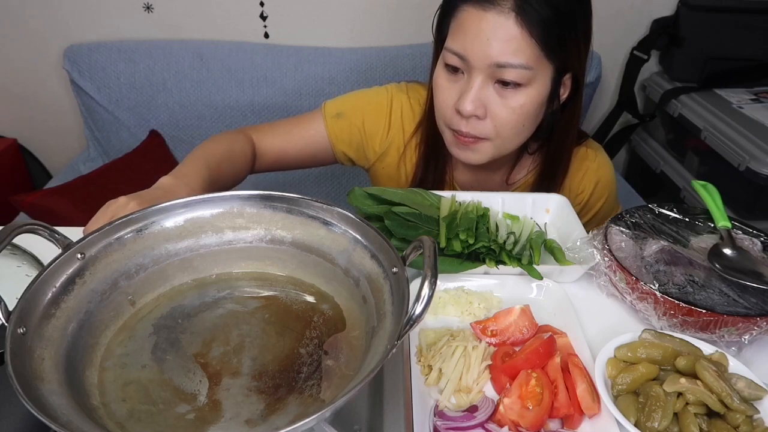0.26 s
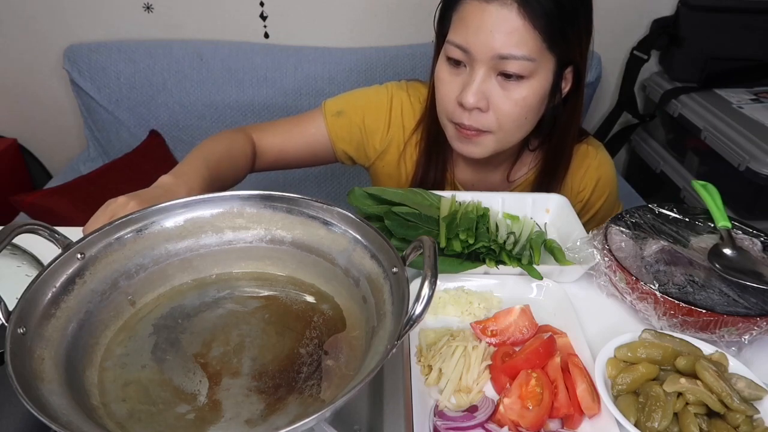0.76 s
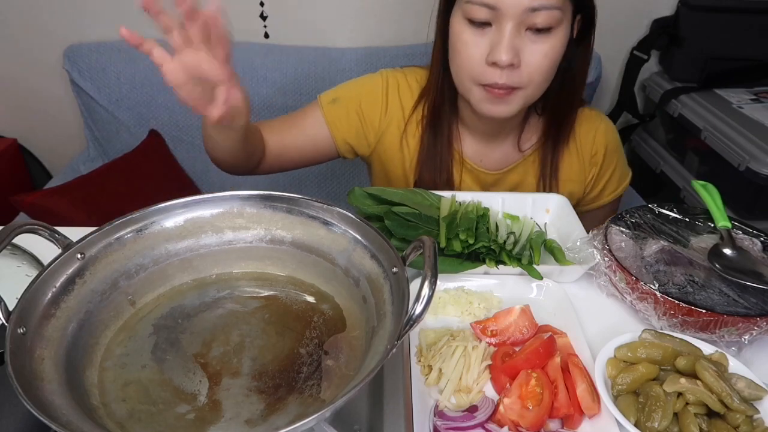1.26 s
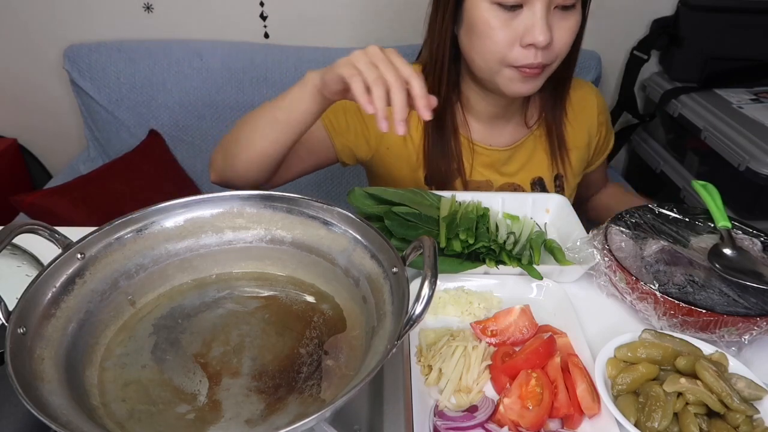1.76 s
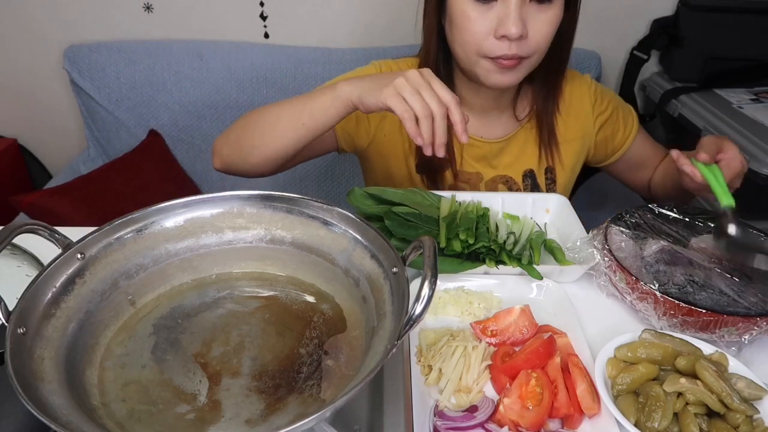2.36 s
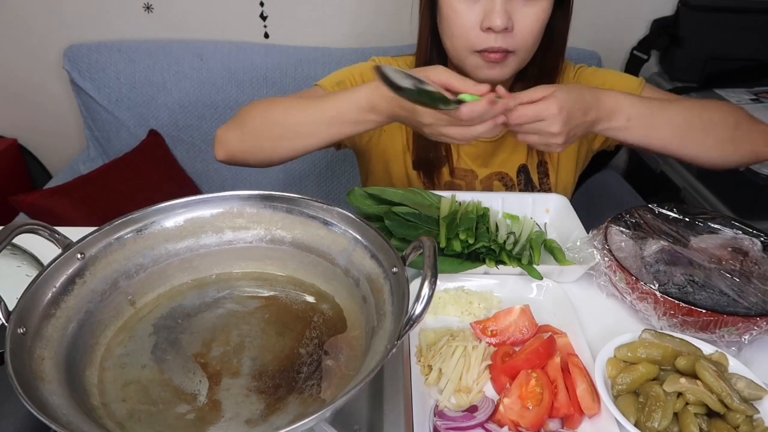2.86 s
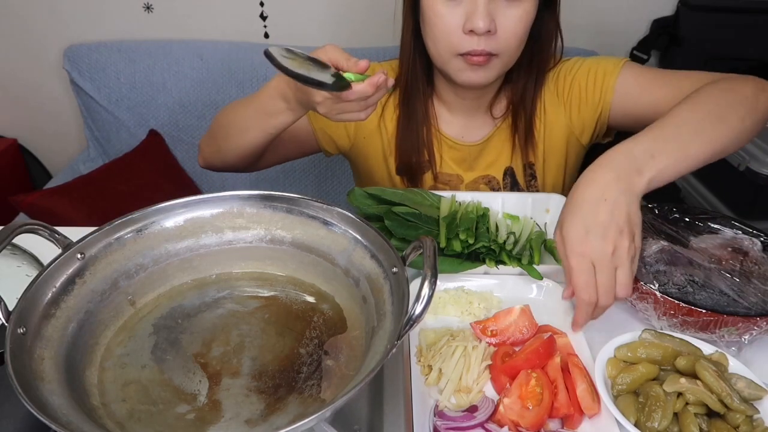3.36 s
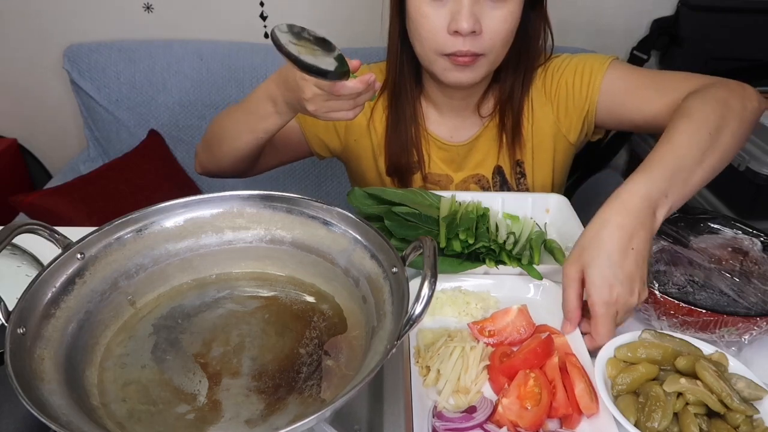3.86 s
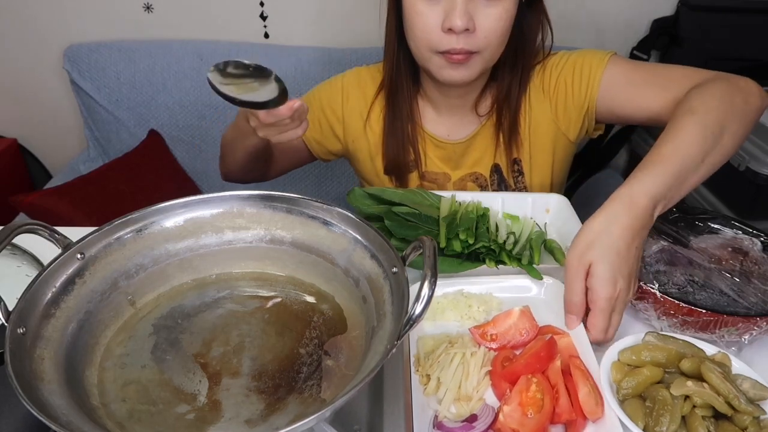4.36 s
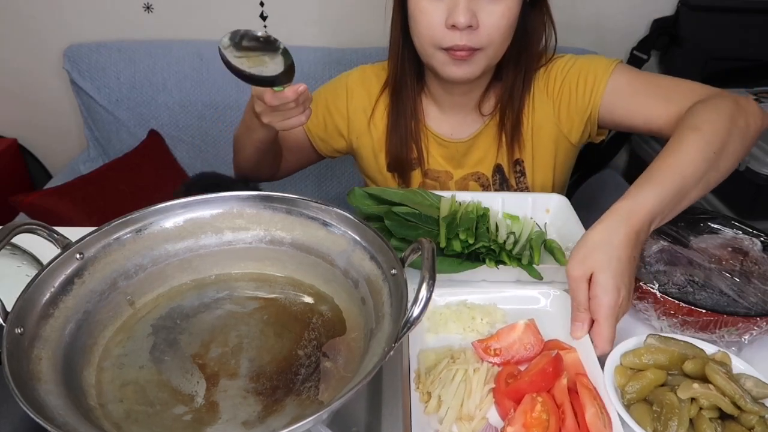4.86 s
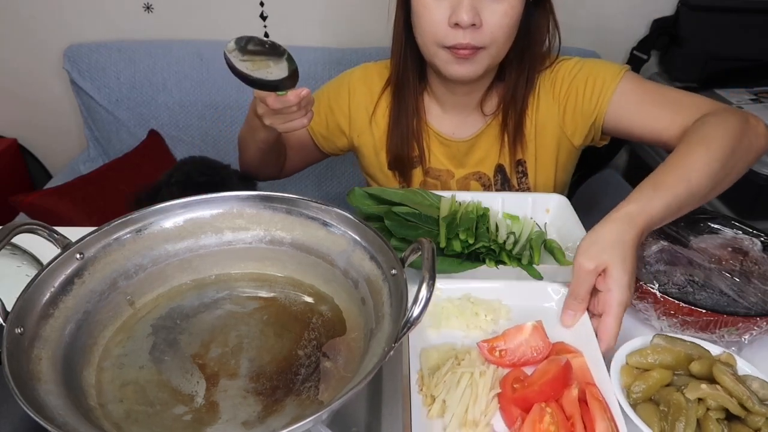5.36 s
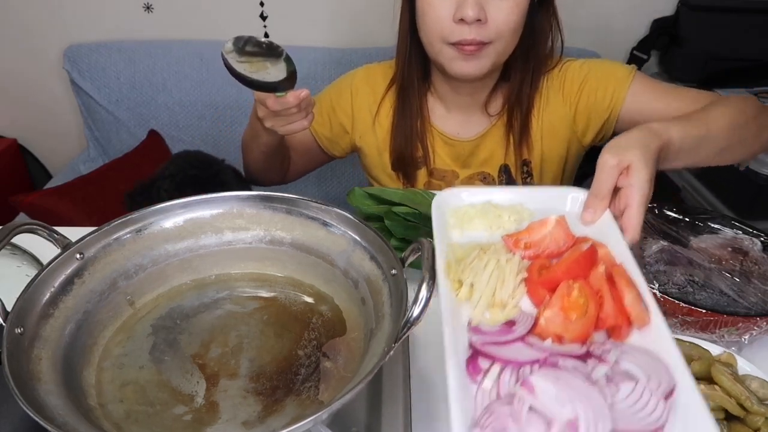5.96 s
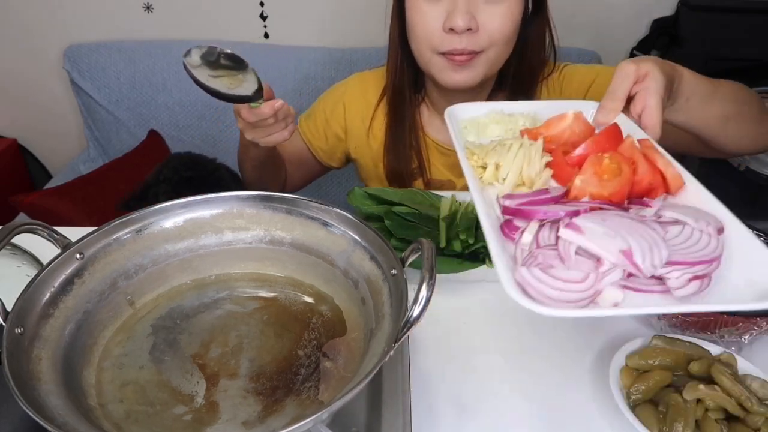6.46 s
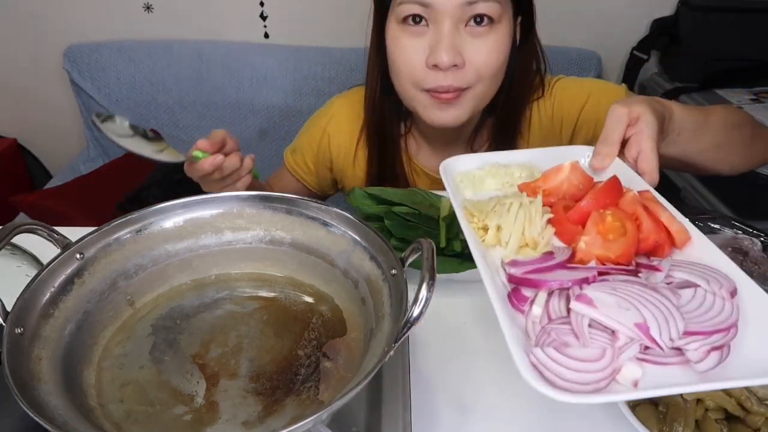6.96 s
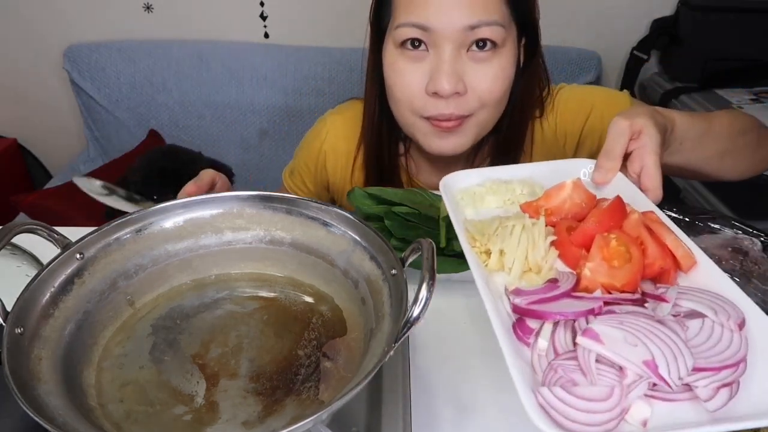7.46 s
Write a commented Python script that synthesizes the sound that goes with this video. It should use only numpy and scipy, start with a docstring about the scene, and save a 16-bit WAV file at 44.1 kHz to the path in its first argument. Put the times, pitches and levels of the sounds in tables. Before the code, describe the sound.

Dishes knock, scrape and squeak on a table as a tray is shifted and lifted, over a droning fan and a ticking clock.

```python
"""From the start a fan drones over mains hum in a small furnished room, and a clock ticks once a second.
A dish is nudged near 1 s, and a ladle is taken from its plate near 2.4 s. From 3.5 to 5.8 s dishes are
knocked, dragged and lifted: impacts excite the damped modes of dish, tray and table, friction drives
them into rasps and squeaks, and a grazed bowl rings with beats. After the loudest knock, at 5.5 s,
the automatic gain drops and creeps back, and the fan and clock carry on alone."""
import sys
import numpy as np
from scipy import signal
from scipy.fft import rfft, irfft
from scipy.io import wavfile

SR = 44100
rng = np.random.default_rng(int(sys.argv[2]) if len(sys.argv) > 2 else 0)


def unload_wav(signal):
    """Save mono or channel-first audio to the path in sys.argv[1] as 16-bit WAV at rate SR, clipped to [-1, 1]."""
    wavfile.write(
        sys.argv[1],
        SR,
        np.round(np.clip(np.atleast_2d(signal).T, -1, 1) * 32767).astype(np.int16),
    )


N = 339570

# Normal modes of each body: frequency_hz, level_db, t60_s
DISH_MODES = [(795, -4.5, 0.012), (936, 4.5, 0.016), (1093, 6, 0.02), (1190, 3.5, 0.02), (1350, 2, 0.022),
              (1523, 0, 0.025), (1597, 2.5, 0.023), (1676, 2, 0.015)]
EDGE_MODES = [(1857, 2.8, 0.013), (2114, 4, 0.013), (2330, 3, 0.0078), (2700, 2, 0.0093), (3080, 0, 0.0079),
              (3450, -1, 0.007), (3770, -4, 0.006), (4400, -8.5, 0.0061), (4960, -10, 0.003)]
TRAY_MODES = [(467, 0, 0.029), (520, 0, 0.04), (637.6, 2.3, 0.025), (705, -0.6, 0.035), (767, -0.4, 0.013)]
TABLETOP_MODES = [(282, -7, 0.034), (309.6, 0, 0.046), (343, 4, 0.042), (468, -3, 0.073)]
FRAME_MODES = [(143, 0.0072, 0.06), (206, 0, 0.04)]
# Impacts: start_s, dish_peak_db, tray_db, edge_db, tabletop_db, frame_db, hardness_db, rattle_t60_s
# (tray_db to hardness_db are relative to the dish)
IMPACTS = [(0.2588, -54.5, -3, 18, 7, -18, 15, 0.099), (1.067, -40, 0, -3.5, -5, -25, -28, 0.11),
           (1.0839, -45, 3, -11, -18, -21, -26, 0.073), (3.456, -15, -6, -0.5, -8, -11.5, -2, 0.031),
           (3.461, -25.5, 5.5, -4, -5, -4, -9, 0.075), (3.7401, -35, -1.5, -4.5, 1, -9, -5.5, 0.1),
           (3.9651, -25, -1.5, 2.5, -16, -7.5, -9.5, 0.16), (4.2174, -46, -5, 2, 8, -7, -25, 0.13),
           (4.294, -45, 1, 4, -5, -8, -19, 0.071), (4.339, -20.5, -6, 5.5, -6, -10.5, -13, 0.06),
           (4.495, -21.5, -0.5, 2.5, -0.5, -32, -14, 0.16), (4.5607, -24.5, -2, -3.5, -12, -5.5, -25, 0.16),
           (4.584, -26.5, 3, -6, 5, -17, -30, 0.065), (4.7076, -38, -4, -2, -4, -20, -25, 0.043),
           (4.7483, -15, -8, 3.5, -5.5, -42, -11, 0.018), (4.817, -29.5, -1, 0, 0, -3, -35, 0.049),
           (4.9251, -27.5, -6.5, -2.5, -4, -24, -40, 0.05), (4.951, -33, -23, 0, -11.5, -22, -24, 0.026),
           (4.9694, -21, -3, 4.5, -10.5, -18, -6, 0.13), (5.103, -32, -2.5, 20, -15, -24.5, -5, 0.05),
           (5.1132, -13, -10.5, 6.5, -1, -36, -11, 0.023), (5.1212, -21.5, -4, 4, 0.5, -34, -10, 0.05),
           (5.1535, -20, -6, 10.5, -27, -18, 3.5, 0.016), (5.4741, -41, -2, 4.5, -19.5, -28, -16, 0.033),
           (5.518, -2.5, -1.5, -1.5, -1.5, -18.5, -41, 0.09),
           (5.6388, -31, 4.5, 5.5, -21, -26, -36.5, 0.091), (5.7356, -25, 3, 2, -34, -37, -34, 0.056)]
def knocks():
    """Impact excitation: one contact force drives five bodies; a harder contact adds more crack."""
    start_s, dish_db, tray_db, edge_db, top_db, frame_db, hardness_db, rattle_s = np.transpose(IMPACTS)
    impacts = np.maximum(1.95 + 0.03 * dish_db, .3)  # soft knocks have a weaker first contact
    forces = [contact_force(t60, impact) for t60, impact in zip(rattle_s, impacts)]
    bodies = [(EDGE_MODES, edge_db), (FRAME_MODES, frame_db), (TABLETOP_MODES, top_db),
              (TRAY_MODES, tray_db), (DISH_MODES, 0)]
    ringing = sum(strike(zip(start_s, dish_db + share_db, forces), modal_body(modes))
                  for modes, share_db in bodies)
    treble_forces = [contact_force(3.7 * t60, impact=0.63) for t60 in rattle_s]
    return ringing + strike(zip(start_s, dish_db + hardness_db - 4, treble_forces), crack)


# Modes of the glazed rim: frequency_hz, level_db, t60_s
RIM_MODES = [(2315, -7, .008), (2450, 0, .011), (2570, -4, .012), (2735, -8, .01), (2980, -14, .008),
             (3850, -11, .008), (4070, -6, .014), (4350, -12, .006), (4700, -15, .007), (5200, -22, .006),
             (6150, -27, .008)]
# Touches on it: start_s, peak_db, chatter_t60_s
RIM_CONTACTS = [(4.3396, -17.5, .07), (4.7483, -19, .09), (4.818, -33.5, .09), (4.971, -29, .08),
                (5.154, -20, .04), (5.5182, -26, .05)]
def rim_chatter():
    """Contact chatter: rapid rebounds re-excite the high modes of the rim."""
    blows = [(start_s, db, contact_force(t60, impact=2.2)) for start_s, db, t60 in RIM_CONTACTS]
    return strike(blows, modal_body(RIM_MODES, spread_db=2, lowpass_hz=8900))


# Drags: peak_s, dish_and_tray_rms_db, rise_s, fall_s, edge_db, table_db, grit_db (last three relative)
DRAGS = [(1.061, -50.5, 0.076, 0.2, -8, -11, -32), (4.112, -47, 0.054, 0.06, -6.5, -4, -31),
         (4.28, -47, 0.19, 0.06, -5.5, -3, -20), (4.55, -35, 0.066, -0.15, -11, -11, -32),
         (4.6, -43.5, 0.063, 0.21, -3, 1, -20), (4.738, -40.5, 0.054, -0.2, -11, -1.5, -22),
         (4.98, -44, 0.16, 0.46, -10, 1, -29), (5.104, -32.5, 0.06, 0.1969, 2.5, -18, -19),
         (5.173, -37, 0.14, 0.11, -5.5, -3, -14), (5.486, -31.5, 0.062, 0.1144, -4, -12, -25),
         (5.56, -30, 0.11, 0.02, -7, 2.5, -24), (5.666, -32.5, 0.11, 0.1127, -6, -11, -26),
         (5.754, -33.5, 0.063, 0.0861, -2, -20, -20.5)]
def slides(friction):
    """Sliding friction: micro-contacts drive the bodies that knocks excite, and grit adds hiss."""
    edge_db, table_db, grit_db = np.transpose(DRAGS)[4:]
    grid_s = np.arange(0, N + 64, 64) / SR
    swells = [swell(grid_s - peak_s, db, rise_s, fall_s) for peak_s, db, rise_s, fall_s, *_ in DRAGS]
    layers = [(table_db, modal_body(FRAME_MODES + TABLETOP_MODES)(friction)),
              (np.zeros(len(DRAGS)), modal_body(TRAY_MODES + DISH_MODES, spread_db=-0.5)(friction)),
              (edge_db, modal_body(EDGE_MODES, spread_db=1.5)(friction)),
              (grit_db, butter(butter(friction, 2, 4000, "high"), 2, 6500)),
              (grit_db - 27.5, butter(friction, 2, [11500, 15200], "band"))]  # the finest grains
    t = np.arange(N) / SR
    return sum(np.interp(t, grid_s, amp(share_db) @ swells) * unit_rms(rasp) for share_db, rasp in layers)


# Catches of a dragged dish: peak_s, frequency_hz, rms_db, rise_s, fall_s
CATCHES = [(4.572, 1110, -33, 0.022, 0), (4.595, 2710, -41, 0.045, 0.1), (5.071, 1130, -30, 0.018, -0.36),
           (5.115, 2060, -40, 0.025, -2.3), (5.125, 3140, -34, 0.039, -0.44),
           (5.17, 1766, -31.5, .05, -0.31), (5.175, 2770, -31, 0.03, -0.61),
           (5.19, 3450, -41, 0.044, -0.68), (5.475, 2000, -38, 0.034, 0.15), (5.49, 1266, -31, 0.026, 0),
           (5.66, 2120, -48, 0.045, -1.6), (5.755, 2020, -35, 0.058, -0.01)]
def squeaks(friction):
    """Forced resonance: the dish catches, and friction keeps one narrow mode singing."""
    half = SR // 4
    t, out = np.arange(-half, half) / SR, np.zeros(N)
    for peak_s, hz, db, rise_s, fall_s in CATCHES:
        span = slice(round(peak_s * SR) - half, round(peak_s * SR) + half)
        out[span] += swell(t, db, rise_s, fall_s) * unit_rms(resonator(friction[span], hz, t60=.04))
    return out


def friction_force(contacts_per_s=6000, lumps_per_s=90, lump_db=3):
    """Surface roughness: dense random impulses whose strength comes in lumps."""
    knots = rng.standard_normal(int(N / SR * lumps_per_s) + 2)
    lumps = amp(lump_db * np.interp(np.arange(N) / SR * lumps_per_s, np.arange(len(knots)), knots))
    touching = rng.random(N) < contacts_per_s / SR
    strength = amp(1.8 * np.minimum(rng.exponential(1, N), 4))
    return lumps * touching * strength * rng.choice([-1, 1], N)


# Modes of the steel ladle: frequency_hz, level_db, t60_s
LADLE_MODES = [(324, -2, 0.022), (630, 2, 0.016), (820, 0, .02), (916, -2.5, 0.033), (1250, -6, 0.019),
               (1400, -3, 0.011), (2060, -0.5, 0.014), (2500, -4, 0.0078), (3570, -4.5, 0.0098),
               (3810, -4, .008), (4390, -8, 0.0088), (5000, -13, .008)]
# Taps on its plate: start_s, peak_db, relative_crack_db, rattle_t60_s
LADLE_CONTACTS = [(2.298, -40, -9, 0.033), (2.439, -30, -1, 0.017), (2.4451, -25, -3.5, 0.06)]
def ladle():
    """Damped vibration: steel held in the hand rings only briefly after each tap."""
    start_s, peak_db, crack_db, rattle_s = np.transpose(LADLE_CONTACTS)
    forces = [contact_force(t60, impact=2) for t60 in rattle_s]
    steel = modal_body(LADLE_MODES, spread_db=3.5, lowpass_hz=7000)
    ringing = strike(zip(start_s, peak_db, forces), steel)
    return ringing + strike(zip(start_s, peak_db + crack_db, forces), crack)


# Modes of the bowl: frequency_hz, level_db, free_t60_s
BOWL_MODES = [(612, 0, .6), (656, -2, .5), (1351, -20, .15), (2062, -20, .12)]
# Grazes by a dish: start_s, peak_db, t60_fraction (what a touching hand leaves)
BOWL_GRAZES = [(1.0605, -38, 0.21), (4.22, -42.5, 1.0), (4.265, -35, 1.0), (5.722, -24.5, 0.44),
               (5.765, -25, 0.95)]
def bowl():
    """Beating: a single impulse excites the bowl, and its two close lowest modes interfere."""
    impulse = np.arange(SR // 2 + SR // 8) == 0
    out = np.zeros(N)
    for start_s, peak_db, fraction in BOWL_GRAZES:
        modes = [(hz, db, t60 * fraction) for hz, db, t60 in BOWL_MODES]
        out += strike([(start_s, peak_db, impulse)], modal_body(modes, spread_db=-5.5))
    return out


# Modes of the clock: frequency_hz, level_db, t60_s
CLOCK_MODES = [(1416, -6, 0.01), (1800, -9, .006), (2270, -5, 0.005), (2800, -9, 0.005), (3400, -8, 0.004),
               (3950, -9, .005), (4600, -14, .004), (5400, -17, 0.004), (6100, -20, .004)]
# Gear impacts within a tick: delay_s, even_second_db, odd_second_db
GEAR_IMPACTS = [(0, -38.5, -46), (.012, -43.5, -55), (.023, -46, -40), (.032, -42, -39),
                (0.049, -46.5, -65)]
# Strength of each successive tick: offset_db
TICK_OFFSETS = [-3.8, 1.7, -4, 3, 3.8, 2, -1.5, -3]
def clock(first_tick_s=.537):
    """Periodic impacts: a motor steps the gear once a second with alternating polarity."""
    blows = []
    for second, offset_db in enumerate(TICK_OFFSETS):
        for delay_s, even_db, odd_db in GEAR_IMPACTS:
            db = (odd_db if second % 2 else even_db) + offset_db + rng.standard_normal()
            force = contact_force(0.053, impact=0.49)[:SR // 8]
            blows.append((first_tick_s + second + delay_s, db, force))
    ringing = strike(blows, modal_body(CLOCK_MODES, spread_db=3, lowpass_hz=8200))
    return ringing + amp(-14) * strike(blows, crack)


# Spectral shape of the air noise: frequency_hz, relative_density_db
AIR_SPECTRUM = [(12, -42), (20, -6), (53, -5.5), (80, -6.5), (112, -1.5), (144, -13), (219, -11.5),
                (245, -15), (324, -9.5), (416, -16.5), (667, -19.5), (788, -18), (3750, -30.5),
                (12800, -50.5), (15500, -63.5)]
# Its stereo width: frequency_hz, side_minus_mid_db
AIR_WIDTH = [(25, -30), (60, -41), (110, -20.5), (200, -9), (380, -4), (700, -6.5), (1290, -5.5),
             (2380, -4), (4400, -2.5), (8120, 0), (15000, 6.5)]
# Room resonances stirred by the fan, then blade and mains tones: frequency_hz, bandwidth_hz, rms_db
DRONE_BANDS = [(40.6, 4.5, -61), (61.6, 9.5, -58.5), (109.1, 7.2, -56), (216.3, 6.6, -59.5), (320, 21, -62),
               (123.6, 0.52, -61), (368.2, 5.6, -67.5), (664, 79, -64), (13050, 60, -90)]
def fan(air_rms_db=-49.5):
    """Broadband and tonal noise: rushing air, nearly coherent in the bass, under wavering tones."""
    hz = np.fft.rfftfreq(N, 1 / SR)
    air = rfft(rng.standard_normal((2, N))) * amp(db_at(AIR_SPECTRUM, hz))
    mid, side = (amp(air_rms_db) * spectrum / np.std(irfft(spectrum, N)) for spectrum in air)
    mid, side = irfft(mid, N), irfft(side * amp(db_at(AIR_WIDTH, hz)), N)
    for centre_hz, width_hz, db in DRONE_BANDS:
        band = rfft(rng.standard_normal(N)) / (1 + (2 * (hz - centre_hz) / width_hz) ** 2)
        mid += amp(db) * unit_rms(irfft(band, N))
    return np.array([mid + side, mid - side])


# Stereo width of the reverberation: frequency_hz, side_weight_db
REVERB_WIDTH = [(60, -19), (110, -26.5), (200, -17), (380, -14.5), (700, -24.5), (1290, -16), (2380, -18),
                (4400, 0.5), (8120, 5), (15000, 17.5)]
def room(x, t60=0.31, side_t60=0.18, level_db=-6):
    """Diffuse reverberation: treble dies sooner, and the channels differ mainly at short wavelengths."""
    t = np.arange(SR // 2) / SR
    dull, bright, side = rng.standard_normal((3, len(t))) * np.clip(t / 0.0063, 0, 1)
    fade = amp(-60 * t / t60)
    mid = (butter(dull, 1, 3045) + amp(5.5) * bright * fade) * fade
    width = amp(db_at(REVERB_WIDTH, np.fft.rfftfreq(len(t), 1 / SR)) + 5.5)
    side = irfft(rfft(side * amp(-60 * t / side_t60)) * width, len(t))
    tails = amp(level_db) * np.array([mid + side, mid - side]) / np.sqrt(np.sum(mid ** 2))
    return signal.fftconvolve(x[None], tails, axes=1)[:, :N]


def contact_force(rattle_t60, impact):
    """Impact and rebound: a brief first contact weighted by `impact`, then a dying rattle."""
    t = np.arange(SR // 8) / SR
    contact, rattle = rng.standard_normal((2, len(t)))
    contact *= amp(-60 * t / 0.004)
    contact[0] = 10  # the edge lands first
    rattle *= np.abs(rattle) * amp(-60 * t / np.clip(rattle_t60, .004, .3))
    force = impact * unit_rms(contact) + unit_rms(rattle)
    return np.pad(force, (0, SR // 4 - len(t)))  # time for the body to ring


def strike(blows, body):
    """Superposition: a body's responses to blows (start_s, peak_db, force) add up."""
    out = np.zeros(N + SR)
    for start_s, peak_db, force in blows:
        start, sound = round(start_s * SR), body(force)
        out[start:start + len(sound)] += amp(peak_db) * sound / np.abs(sound).max()
    return out[:N]


def modal_body(modes, spread_db=2.14, lowpass_hz=6000):
    """Modal summation: modes of alternating sign and random strength, driven through a soft contact."""
    def body(force):
        strength = amp(spread_db * rng.standard_normal(len(modes)))
        force = butter(force, 2, lowpass_hz)
        ringing = sum((-1) ** k * strength[k] * amp(db) * resonator(force, hz, t60)
                      for k, (hz, db, t60) in enumerate(modes))
        return butter(ringing, 2, 0.84 * modes[0][0], "high")  # little radiates below the lowest mode
    return body


def resonator(x, hz, t60):
    """Damped harmonic oscillator: a unit impulse starts a decaying sine of height about 1."""
    radius, angle = amp(-60 / (max(t60, .004) * SR)), 2 * np.pi * hz / SR
    return signal.lfilter([0, np.sin(angle)], [1, -2 * radius * np.cos(angle), radius ** 2], x + 1e-18)


def crack(force):
    """Direct radiation from the contact: a band of treble."""
    return butter(butter(force, 2, 3800, "high"), 3, 6000)


def swell(t, peak_db, rise_s, fall_s):
    """Exponential growth and decay about t = 0: 20 dB per rise_s or fall_s, each at least 10 ms."""
    return amp(peak_db - 20 * np.maximum(-t / max(rise_s, .01), t / max(fall_s, .01)))


def butter(x, order, hz, kind="low"):
    """Maximally flat filter."""
    return signal.sosfilt(signal.butter(order, hz, kind, fs=SR, output="sos"), x + 1e-18)


def amp(db):
    """Decibels to amplitude ratio."""
    return 10 ** (np.asarray(db) / 20)


def unit_rms(x):
    """Normalisation to rms 1."""
    return x / np.sqrt(np.mean(x ** 2) + 1e-20)


def db_at(spectrum, hz):
    """Interpolation on a logarithmic frequency axis."""
    points_hz, points_db = np.transpose(spectrum)
    return np.interp(np.log(hz + 1), np.log(points_hz), points_db)


def scene():
    """Direct and reverberant fields add over the fan; the dishes reach the right channel sooner."""
    struck = knocks() + rim_chatter()
    friction = friction_force()
    dishes = struck + slides(friction) + squeaks(friction) + ladle()
    dishes = butter(dishes, 3, 115, "high")  # small bodies radiate no deep bass
    ticks = clock()
    side = amp(-7) * np.gradient(dishes) + amp(-47) * dishes  # the slope acts as a tiny time shift
    direct = np.array([dishes - side, dishes + side]) + bowl() + ticks
    return direct + room(dishes + amp(5.5) * ticks) + fan()


def record(dry, threshold_db=-4.83, release_db_per_s=8, smoothing_s=0.015, cutoff_hz=15900):
    """Automatic gain control ducks after loud peaks and recovers; saturation and a low-pass follow."""
    over_db = np.maximum(20 * np.log10(np.abs(dry).max(axis=0) + 1e-9) - threshold_db, 0)
    release_db = release_db_per_s * np.arange(N) / SR
    held_db = np.maximum.accumulate(over_db + release_db) - release_db
    pole = np.exp(-1 / (smoothing_s * SR))
    gain = amp(-signal.lfilter([1 - pole], [1, -pole], held_db))
    ducked = dry * amp([[-0.075], [0.075]]) * gain  # the right channel is slightly more sensitive
    saturated = np.clip(1.624 * np.tanh(ducked / 1.578), -1, 1)
    return signal.sosfilt(signal.cheby2(12, 70, cutoff_hz, fs=SR, output="sos"), saturated)


dry = scene()
out = record(dry)
unload_wav(out)
```